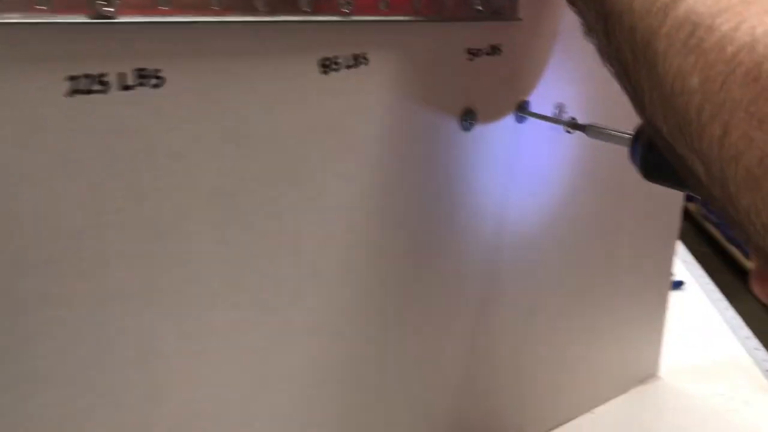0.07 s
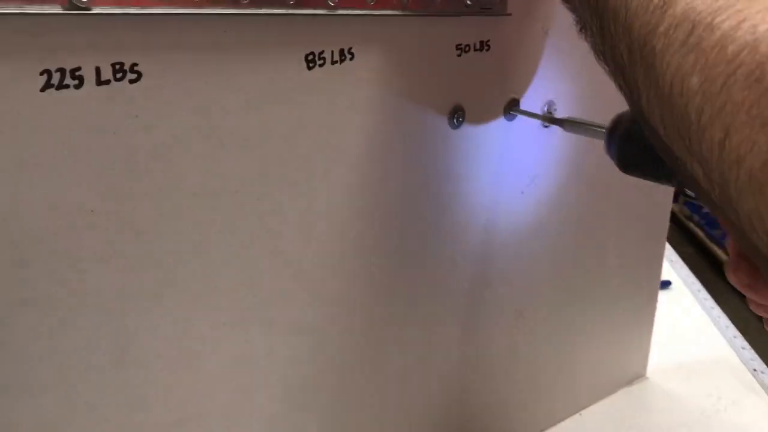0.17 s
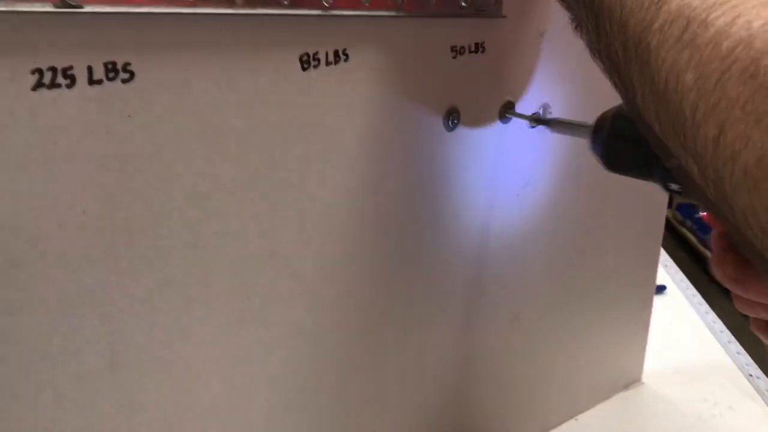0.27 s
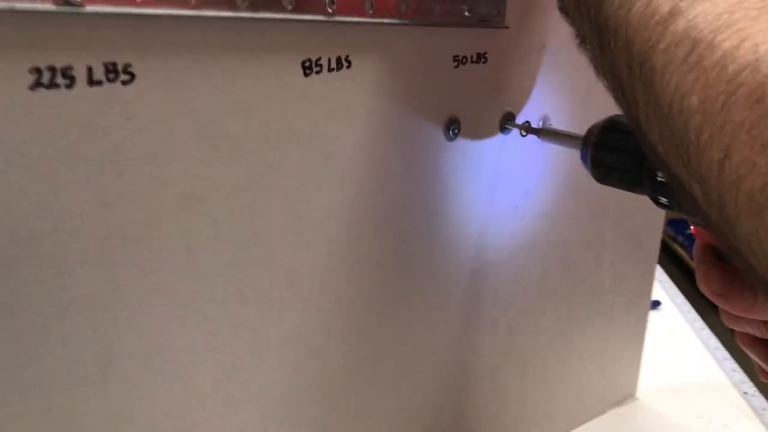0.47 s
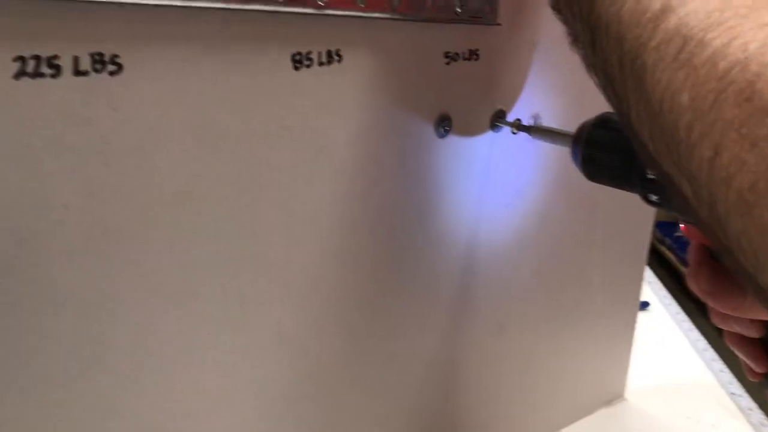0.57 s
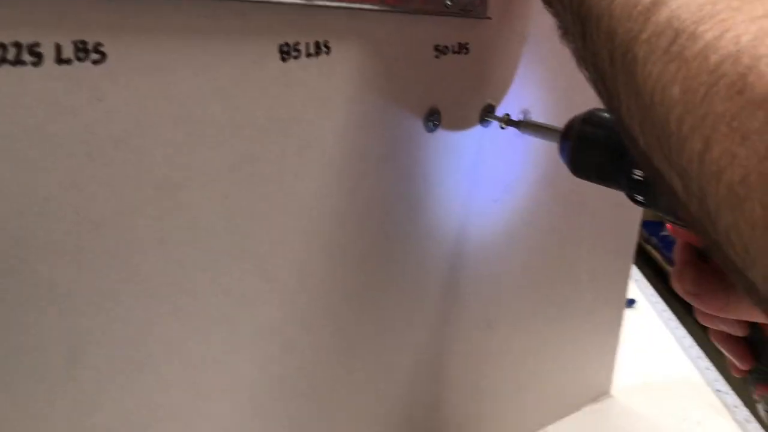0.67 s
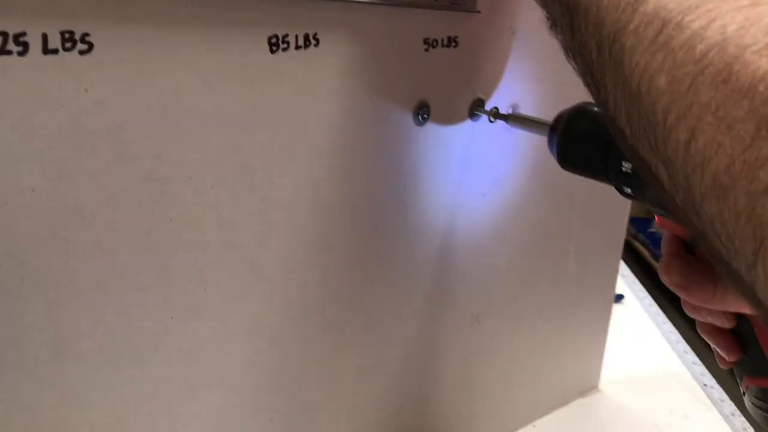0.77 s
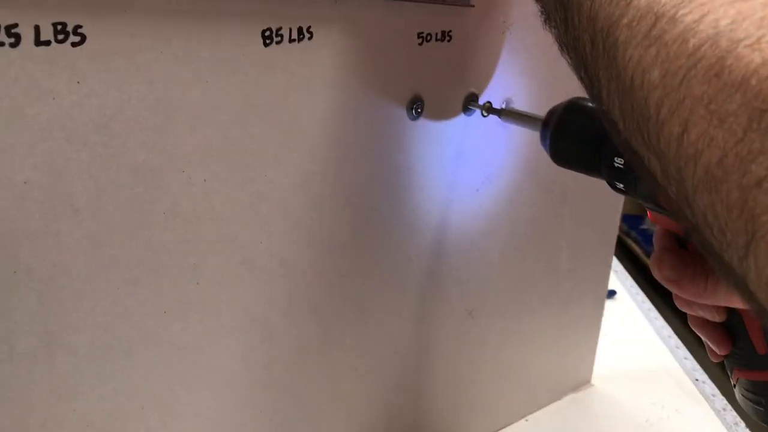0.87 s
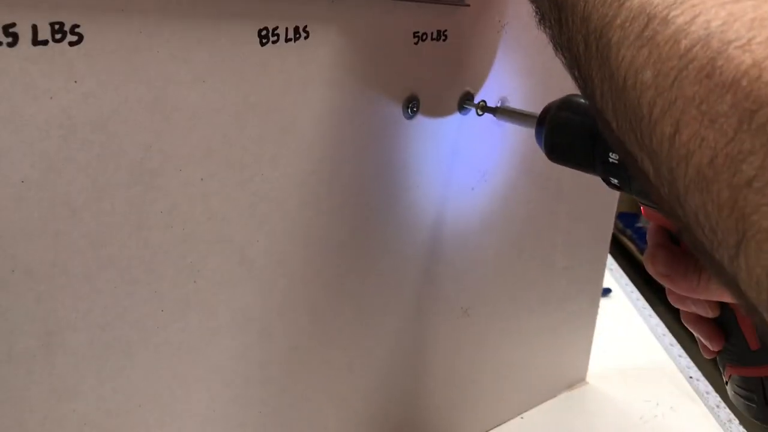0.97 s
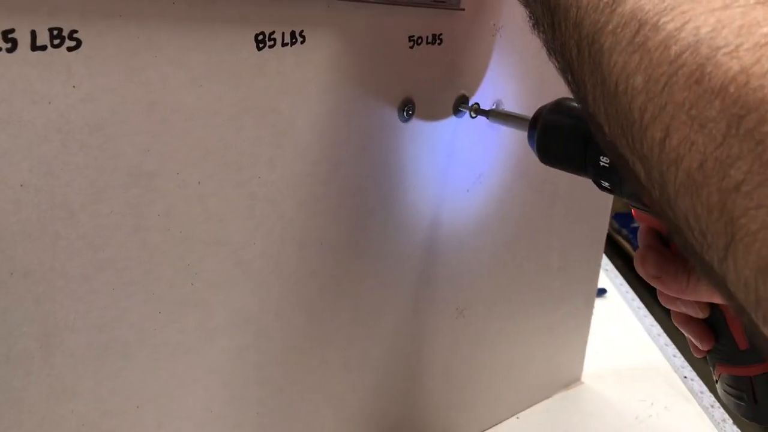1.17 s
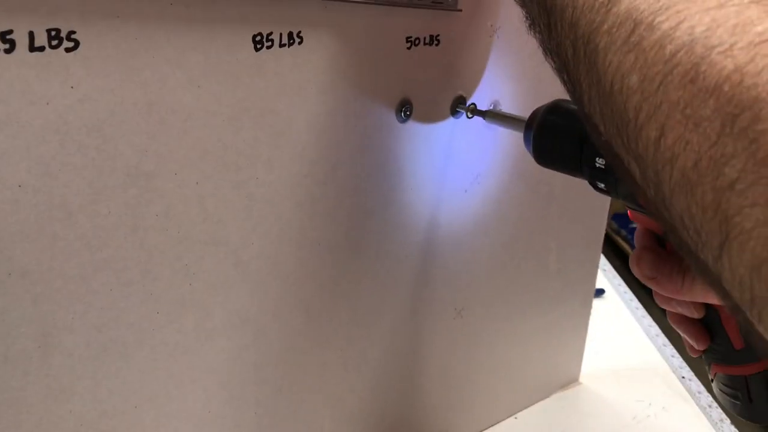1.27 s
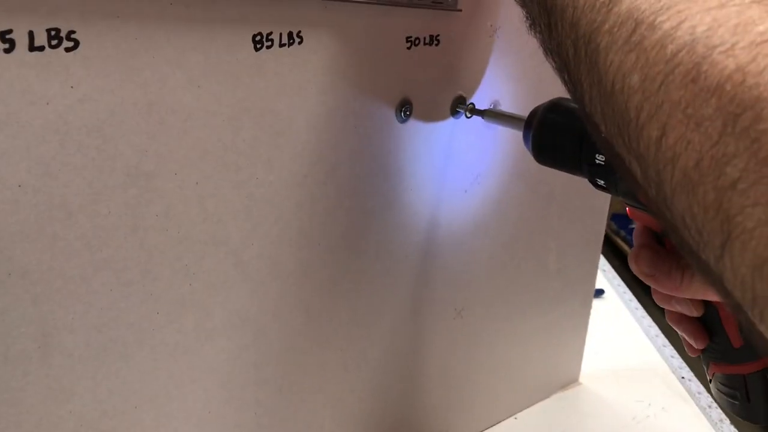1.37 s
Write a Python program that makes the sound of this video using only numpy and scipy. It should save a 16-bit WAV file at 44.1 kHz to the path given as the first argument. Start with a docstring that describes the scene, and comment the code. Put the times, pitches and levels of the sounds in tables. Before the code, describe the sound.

A cordless drill works a screw into a hollow wall panel, close by in a small workshop. A low knock fades as the trigger clicks at 0.1 seconds; the motor whirs. Loud crunching slips hit at 0.2-0.3 and, brighter with metallic ringing, 0.36-0.42. Near silence follows. A click at 0.6 precedes slow, quiet turning from 0.66 to the end: thin steady whine, gear clatter, wavering hum, small squeaks, faint scrape near 1.07.

```python
"""An earlier knock dies away in low rumble and a trigger clicks; then a cordless drill drives a screw
into a hollow wall panel, close by in a workshop. The bit slips twice, crunching into the panel; the
trigger clicks again and the motor turns slowly, its speed control whining over gear clatter.
Gears, brushes and scratches are filtered impulse noise, squeals and hums are wavering tones, and
panel and bit are decaying modes, all with a short echo over a quiet noise floor."""
import sys
import numpy as np
from scipy import signal
from scipy.fft import rfft, irfft
from scipy.io import wavfile

SR = 44100
rng = np.random.default_rng(int(sys.argv[2]) if len(sys.argv) > 2 else 0)


def persist_wave(psi):
    """Save psi, clipped to +-1, as 16-bit WAV."""
    counts = np.round(np.clip(psi, -1, 1) * 32767).astype(np.int16)
    wavfile.write(sys.argv[1], SR, np.atleast_2d(counts).T)


N = 61739
TIME = np.arange(N) / SR  # s

# resonances of the drill housing: (frequency [Hz], width [Hz], boost [dB])
HOUSING = [(171, 57, 3.5), (637, 13.3, 9), (1030, 85, 3), (1510, 246, 7.5), (2184, 270, 6.5),
           (3266, 420, 5), (4410, 360, 5.5), (6500, 570, -2), (6500, 160, 1.5), (9540, 330, 7),
           (10870, 340, 4.5), (13400, 540, 3)]
# jolts of the bit against the panel: (time [s], relative level [dB], contact time [s])
JOLTS = [(.128, -23, 0.0023), (0.21, -9, 0.002), (0.228, -1, 0.0027), (0.239, -14.5, 0.00067),
         (.249, -8.5, 0.0011), (.266, -1.5, 0.0016), (0.272, -12, 0.00145), (.281, -9.5, 0.0011),
         (.293, -10.5, .0015), (0.361, -16, 0.001), (.370, -7.5, 0.000426), (0.382, -7, 0.0013),
         (.392, 2, 0.00066), (.399, -2, 0.00129), (.406, -12.5, 0.00051), (.414, -53, 0.0007),
         (0.432, -37, 0.0029), (.303, -16.5, 0.0022), (.325, -19.5, 0.0016), (1.055, -29, 0.0032),
         (1.074, -31, 0.0012), (1.094, -36, 0.00052), (1.145, -29.5, 0.0029)]
MOTOR_RESTART_S = .661  # start of whine and screw hum


def undb(db):
    """Amplitude ratio is ten to the power of decibels over twenty."""
    return 10 ** (np.asarray(db) / 20)


def unit(x):
    """Normalisation to a root-mean-square amplitude of 1."""
    return x / np.sqrt(np.mean(x ** 2))


def curve(table, axis=1):
    """Linear interpolation of one column of a time table, at every sample."""
    points = np.array(table)
    return np.interp(TIME, points[:, 0], points[:, axis])


def decay_from(start_s, length_s):
    """Exponential decay from a sudden onset; length_s is the time to fall to 1/e."""
    return (TIME >= start_s) * np.exp(-np.maximum(TIME - start_s, 0) / length_s)


def colour(x, points, peaks=(), tilt_db=0.):
    """Minimum-phase filtering by (Hz, dB) points, resonances and a tilt [dB per octave]; power gain 1."""
    size = 4096
    hz = np.maximum(np.arange(size // 2 + 1) * SR / size, 1)
    p = np.array(points)
    db = np.interp(np.log(hz), np.log(p[:, 0]), p[:, 1]) + tilt_db * np.log2(hz / 1000)
    for centre_hz, width_hz, boost_db in peaks:
        db = db + boost_db / (1 + (2 * (hz - centre_hz) / width_hz) ** 2)
    # folding the cepstrum onto positive times makes the filter causal
    cepstrum = irfft(np.log(undb(db)))
    fold = np.r_[1, 2 * np.ones(size // 2 - 1), 1, np.zeros(size // 2 - 1)]
    taps = irfft(np.exp(rfft(cepstrum * fold)))
    return signal.fftconvolve(x, taps / np.sqrt(np.sum(taps ** 2)))[:N]


def ring(x, hz, t60):
    """Modal resonance: a damped oscillator falls by 60 dB in t60 seconds after an impulse."""
    pole = np.exp((2j * np.pi * hz - np.log(1000) / t60) / SR)
    return signal.lfilter([1], [1, -pole], x).imag


def knocks(scatter_db, share=0.97):
    """Impulse noise: random signs, sizes of exponential scatter in dB; share = knocks per sample."""
    sign, size, chance = rng.random((3, N))
    largest_db = 12
    size_db = np.minimum(-scatter_db * np.log(size + 1e-9), largest_db)
    return unit(np.sign(sign - .5) * undb(size_db) * (chance < share))


def wavering(table, width_hz):
    """Narrow-band modulation: a tone (s, Hz, dB) blurred by slow random amplitude and phase."""
    c = rng.standard_normal((2, N))
    slow = signal.lfilter([1], [1, -np.exp(-np.pi * width_hz / SR)], c[0] + 1j * c[1])
    steady = 1.8  # relative to the random part's rms
    phasor = steady + slow / np.sqrt(np.mean(np.abs(slow) ** 2))
    phase = 2 * np.pi * np.cumsum(curve(table)) / SR
    return unit((phasor * np.exp(1j * phase)).real) * undb(curve(table, axis=2))


def workshop_floor():
    """Stationary background noise, shaped by its spectral density."""
    # floor spectrum: (frequency [Hz], density [dB per Hz])
    floor_spectrum = [(50, 0.5), (120, 6), (250, -4), (500, -9), (1900, -16.5), (2660, -13.5), (4400, -20),
                      (8000, -25), (15800, -31.5)]
    floor_db = -55
    return undb(floor_db) * unit(colour(rng.standard_normal(N), floor_spectrum))


def echo(dry):
    """Diffuse reverberation: convolution with dulled, exponentially decaying noise."""
    level_db, t60_s, dull_hz = -18, 0.24, 4930
    t = np.arange(SR // 2) / SR
    noise = rng.standard_normal(len(t))
    dulled = signal.lfilter([1], [1, -np.exp(-2 * np.pi * dull_hz / SR)], noise)
    tail = dulled * undb(-60 * t / t60_s) * (t > .006)  # reflections start after 6 ms
    return undb(level_db) * signal.fftconvolve(dry, tail / np.sqrt(np.sum(tail ** 2)))[:N]


def wall():
    """Low-frequency resonance: a rumbling narrow band, and the free decay of an earlier knock."""
    # rumble of the wall: (time [s], pitch [Hz], level [dB])
    rumble = [(0, 76, -41), (.1, 87.5, -93), (.19, 90.8, -44.5), (.224, 93.5, -38), (.3, 89.4, -26.5),
              (.346, 89.4, -46), (.396, 95.8, -24.5), (.45, 86.3, -46), (.55, 88.6, -48), (.585, 87, -73),
              (.64, 89, -44), (.7, 78.1, -67), (.88, 83, -59), (.96, 85.3, -66), (1.15, 89.8, -56),
              (1.25, 89.7, -84), (1.4, 89.3, -54)]
    rumble_width_hz = 25
    knock_hz, knock_db, knock_t60_s, fade_in_s = 189.7, -36, 0.21, 0.0077
    envelope = undb(knock_db - 60 * TIME / knock_t60_s) * np.minimum(TIME / fade_in_s, 1)
    tail = envelope * np.sin(2 * np.pi * knock_hz * TIME)
    return tail + wavering(rumble, rumble_width_hz)


def trigger():
    """Transient excitation: each plastic click is a decaying noise burst around one broad resonance."""
    # clicks: (time [s], starting level [dB], centre [Hz], decay to 1/e [s])
    clicks = [(.067, -45, 6320, .002), (0.121, -51, 8800, 0.0038), (0.126, -34.5, 4100, 0.0037),
              (.607, -41.5, 6020, 0.0023), (0.665, -46, 4870, .002)]
    peak_db = 20  # resonance above its broad skirt
    out = np.zeros(N)
    for start, db, hz, length in clicks:
        burst = rng.standard_normal(N) * decay_from(start, length)
        skirt = [(hz / 6, -14), (hz / 2, 0), (hz * 2, 0), (hz * 4, -10)]
        out += undb(db) * colour(burst, skirt, [(hz, hz, peak_db)])
    return out


def brush_hiss():
    """Broadband noise of brushes and fan, coloured by the housing resonances."""
    # level: (time [s], level [dB])
    hiss_level = [(.112, -80), (.13, -58), (.165, -45), (.22, -43), (.3, -43), (.37, -42), (.43, -41),
                  (.46, -68), (.5, -82), (.66, -68), (.69, -60), (.72, -50.5), (.9, -48), (1.1, -45.5),
                  (1.22, -45), (1.32, -42.5), (1.4, -39.5)]
    # spectrum: (frequency [Hz], density [dB per Hz])
    hiss_spectrum = [(3000, -12), (6000, -3.5), (8000, -7), (10200, -14.5), (11200, -7), (13000, -13.5),
                     (15800, -14)]
    scatter_db = 4.3
    return unit(colour(knocks(scatter_db), hiss_spectrum, HOUSING)) * undb(curve(hiss_level))


def gear_clatter():
    """Impact noise: tooth knocks of scattered size excite the housing resonances."""
    # level: (time [s], level [dB])
    gear_level = [(.118, -84), (.135, -47.5), (.2, -43.5), (.3, -47.5), (.42, -39.5), (.47, -51),
                  (.55, -73), (.655, -62.5), (.69, -51), (.76, -43.5), (.9, -42), (1.02, -45),
                  (1.08, -38.5), (1.16, -41), (1.25, -42.5), (1.33, -42.5), (1.4, -42)]
    # spectrum: (frequency [Hz], density [dB per Hz])
    gear_spectrum = [(35, -19), (60, -38), (164, 0.5), (239, -12), (308, -2), (468, -13.5), (628, -10.5),
                     (683, -12), (1110, -12.5), (4510, -12), (9000, -28.5), (11700, -48), (19800, -120)]
    scatter_db = 4
    return unit(colour(knocks(scatter_db), gear_spectrum, HOUSING)) * undb(curve(gear_level))


def speed_control_whine():
    """Harmonic series: the speed control whines at multiples of one fixed frequency."""
    # harmonics: (multiple, rms level at the start [dB], fade [dB per s]; negative fades grow)
    harmonics = [(1, -59, -1), (2, -59, 12), (3, -55, 0), (4, -68, 30), (5, -75, 20), (6, -64, 6),
                 (7, -76, 25), (8, -78, 10)]
    chop_hz, rise_s = 1829.2, 0.0018
    since_start = TIME - MOTOR_RESTART_S
    whine = np.zeros(N)
    for multiple, db, fade in harmonics:
        phase = rng.random() * 2 * np.pi
        tone = np.sqrt(2) * np.sin(multiple * 2 * np.pi * chop_hz * TIME + phase)
        whine += undb(db - fade * since_start) * tone
    return whine * np.clip(since_start / rise_s, 0, 1)


def squeals():
    """Frictional squeal: gears and screw give short gliding tones of narrow bandwidth."""
    # one table per squeal: (time [s], pitch [Hz], level [dB])
    squeal_tables = [
        [(.15, 4450, -84), (.16, 4470, -55), (.185, 4490, -40), (.21, 4385, -48), (.3, 4470, -52),
         (.33, 3970, -49), (.37, 4250, -51), (.43, 4300, -61)],
        [(.14, 11200, -75), (.18, 11200, -52), (.25, 11200, -72), (.33, 11100, -49), (.37, 11100, -52),
         (.43, 11100, -71)],
        [(.89, 2120, -54), (.94, 2060, -45.5), (.99, 2040, -48.5), (1.02, 2310, -54), (1.05, 2250, -63)],
        [(1.04, 1120, -65), (1.06, 1110, -46), (1.09, 1085, -45), (1.11, 1080, -65)],
        [(1.07, 640, -65), (1.1, 630, -50), (1.125, 630, -51), (1.15, 630, -65)],
        [(1.22, 2980, -65), (1.25, 3040, -51), (1.32, 3280, -51), (1.345, 3350, -65)],
        [(1.2, 4500, -70), (1.24, 4550, -51), (1.3, 4350, -51), (1.4, 4450, -58)],
    ]
    width_share = 0.013  # of the first pitch
    out = np.zeros(N)
    for table in squeal_tables:
        sounding = (TIME > table[0][0]) * (TIME <= table[-1][0])
        out += wavering(table, width_share * table[0][1]) * sounding
    return out


def screw_hum():
    """Quasi-periodic vibration: the turning screw hums in the panel at a drifting pitch."""
    # hum: (time [s], pitch [Hz], level [dB])
    hum = [(.66, 285, -50), (.685, 296.8, -44.5), (.71, 278.2, -52), (.745, 291.4, -40.5),
           (.78, 318.8, -57.5), (.82, 291.8, -41.5), (.87, 319.8, -56), (.93, 297, -43), (.98, 307.4, -40),
           (1.02, 331.7, -54), (1.07, 363.9, -44.5), (1.13, 385.3, -59), (1.2, 341, -88), (1.3, 283, -49.5),
           (1.35, 283.5, -54.5), (1.4, 304.3, -45)]
    width_hz = 21
    return wavering(hum, width_hz) * (TIME > MOTOR_RESTART_S)


def bit():
    """Modal ringing: short rattling blows excite high modes of the steel bit."""
    # blows: (time [s], level [dB])
    bit_blows = [(.378, -37), (.393, -45)]
    # modes: (frequency [Hz], level [dB], 60 dB decay time [s])
    bit_modes = [(8980, -4, .26), (9030, -10, .2), (12310, 0, .17), (13930, -2, .14)]
    rattle_s, rattle_db = .004, -27
    rattle = sum(undb(db) * decay_from(start, rattle_s) for start, db in bit_blows)
    onsets = np.maximum(np.diff(rattle, prepend=0), 0)
    blows = onsets + undb(rattle_db) * rattle * rng.standard_normal(N)
    return sum(undb(db) * ring(blows, hz, t60) for hz, db, t60 in bit_modes)


def grind():
    """Stick-slip friction: dense uneven scratches blend a dull and a bright contact; jolts add cracks."""
    # one table per slip or scrape: (time [s], level [dB], brightness [logit, 0 = half bright])
    slips = [
        [(.208, -49, -4), (.214, -24.5, -2.3), (.224, -25.5, 0.87), (.231, -17.5, -1.6), (.247, -20.5, -0.61),
         (.26, -24, -1.5), (.268, -28.5, -1.3), (.28, -23, -3.1), (.293, -34.5, -0.6), (.305, -43, -0.5),
         (.33, -47, 2)],
        [(.359, -39, -6), (.364, -22.5, -11), (.372, -34, -2), (.379, -16.5, 5), (.386, -27, 4.5),
         (.395, -20.5, 4), (.402, -22.5, 2.5), (.41, -32, -0.5), (.42, -39, -11), (.435, -79, -8),
         (.47, -65, 0)],
        [(1.03, -55, -8), (1.06, -44.5, -1), (1.085, -42, -1), (1.12, -52, -3.5), (1.16, -51, 7)],
    ]
    # spectrum before tilting: (frequency [Hz], density [dB per Hz])
    grind_spectrum = [(150, -14), (400, -9), (700, 1.5), (1050, 2.5), (1600, -4), (2400, -4.5),
                      (3200, -12.5), (4300, -8.5), (6500, -18.5), (10000, -25.5), (15000, -59)]
    scatter_db, knocks_per_s, fade_s = 4.5, 4000, 0.0056
    crack_db, crack_s = -11.5, 0.0014  # relative to the jolt; decay to 1/e
    out = np.zeros(N)
    grit = knocks(scatter_db, knocks_per_s / SR)
    dull = colour(grit, grind_spectrum, tilt_db=-2.5)
    bright = colour(grit, grind_spectrum, tilt_db=3.0)
    for table in slips:
        mix = 1 / (1 + np.exp(-curve(table, axis=2)))
        to_nearest_end = np.minimum(TIME - table[0][0], table[-1][0] - TIME)
        inside = np.clip(to_nearest_end / fade_s, 0, 1)
        out += inside * undb(curve(table)) * (mix * bright + (1 - mix) * dull)
    cracks = sum(undb(db + crack_db) * decay_from(start, crack_s) for start, db, _ in JOLTS)
    return out + colour(cracks * knocks(scatter_db), grind_spectrum, tilt_db=-2.6)


def panel(scratch):
    """Modal superposition: force pulses of finite contact time and the grinding drive damped modes."""
    # modes: (frequency [Hz], level [dB], 60 dB decay time before the cap below [s])
    panel_modes = [(140.4, -1.5, 0.096), (197.5, 2, 0.089), (280.3, 0.5, 0.068), (357, -7, 0.13),
                   (613, -2, 0.1), (646, -13, .2), (832, -13.5, 0.11), (983, -8, 0.074), (1399, -4, 0.056),
                   (1623, 1, .04), (1900, -18, .04), (2427, 2.5, .03), (2630, -9, .03)]
    longest_ring = 56  # cycles, caps the decay time
    push_db, grind_db, scatter_db = -12.5, -37.5, 1.5
    force = np.zeros((len(JOLTS), N))
    for row, (start, db, contact) in enumerate(JOLTS):
        progress = np.clip((TIME - start) / contact, 0, 1)
        # pulse area does not depend on the contact time
        force[row] = undb(db + push_db) * np.sin(np.pi * progress) ** 2 * 2 / (contact * SR)
    # each jolt excites each mode a little differently
    share = undb(scatter_db * rng.standard_normal((len(JOLTS), len(panel_modes))))
    out = np.zeros(N)
    for k, (hz, db, t60) in enumerate(panel_modes):
        drive = share[:, k] @ force + undb(grind_db) * scratch
        out += (-1) ** k * undb(db) * ring(drive, hz, min(t60, longest_ring / hz))
    return out


def scene():
    """Linear superposition of all sources, their echo and the workshop's floor."""
    scratch = grind()
    motor = gear_clatter() + brush_hiss() + speed_control_whine() + squeals() + screw_hum()
    dry = wall() + trigger() + motor + bit() + scratch + panel(scratch)
    return (dry + echo(dry) + workshop_floor())[None]


def record(dry):
    """Band limiting and soft saturation: deep bass is cut, peaks are rounded, the top is cut."""
    low_hz, top_hz, round_off = 46, 15680, .8
    thin = signal.sosfilt(signal.butter(2, low_hz, "high", fs=SR, output="sos"), dry)
    rounded = np.tanh(round_off * thin) / round_off
    return signal.sosfilt(signal.ellip(14, .2, 80, top_hz, fs=SR, output="sos"), rounded)


dry = scene()
out = record(dry)
persist_wave(out)
```